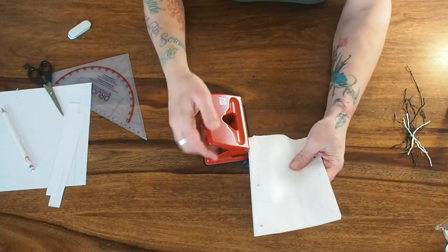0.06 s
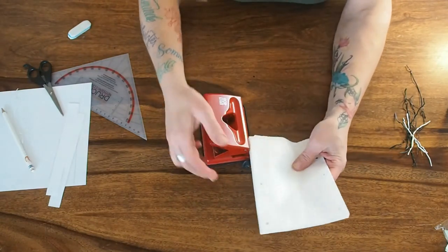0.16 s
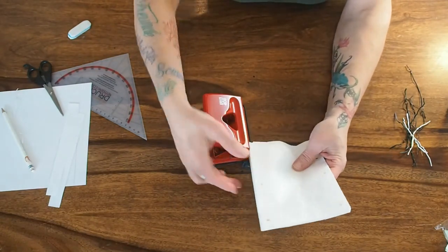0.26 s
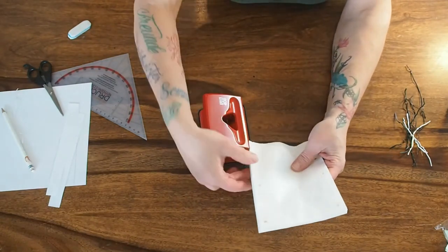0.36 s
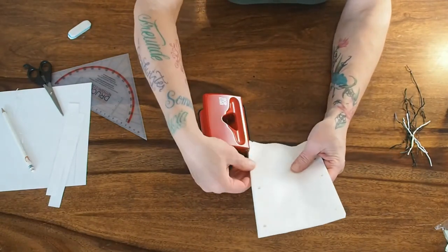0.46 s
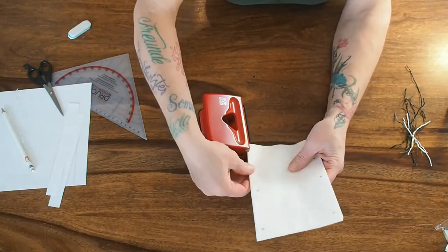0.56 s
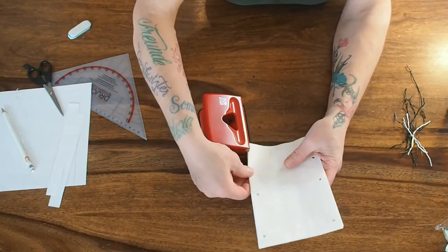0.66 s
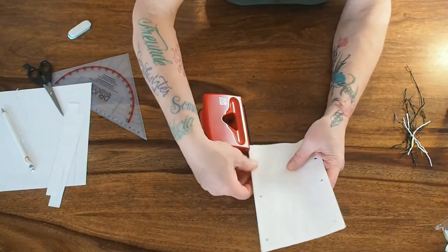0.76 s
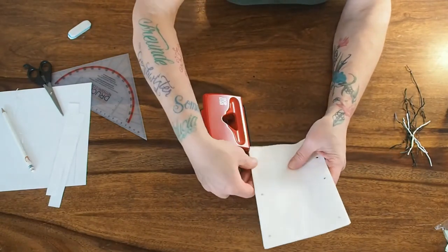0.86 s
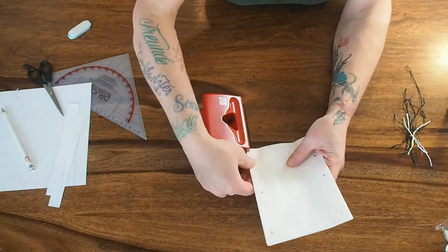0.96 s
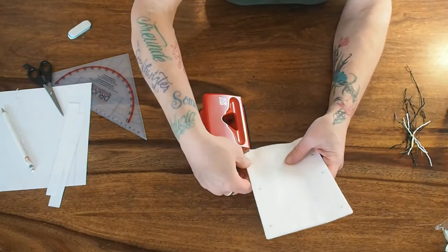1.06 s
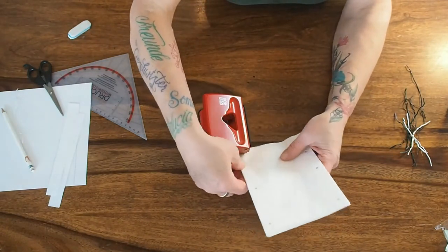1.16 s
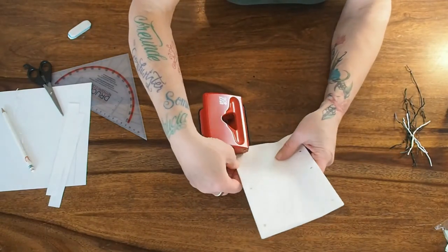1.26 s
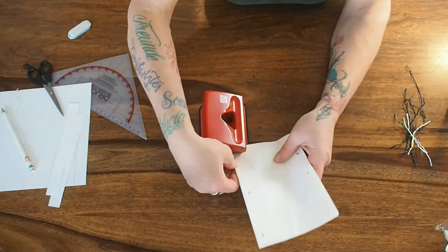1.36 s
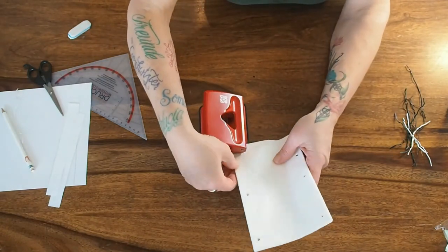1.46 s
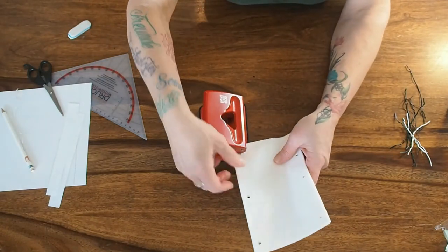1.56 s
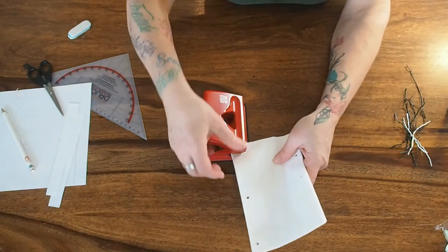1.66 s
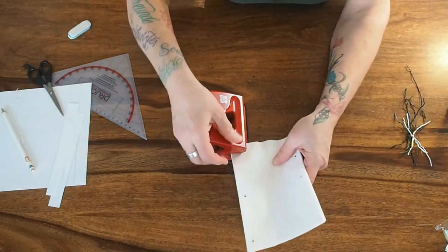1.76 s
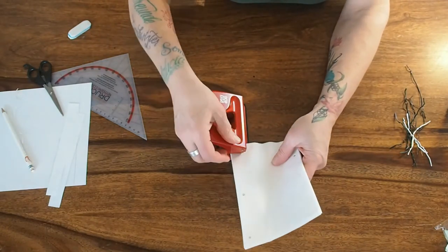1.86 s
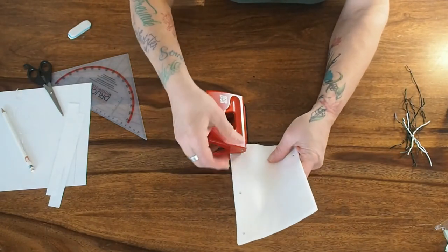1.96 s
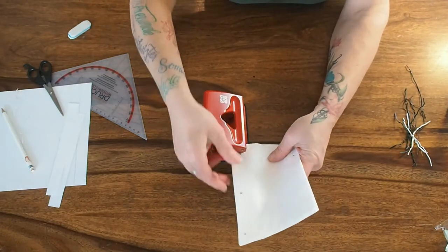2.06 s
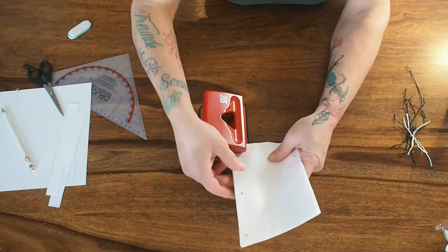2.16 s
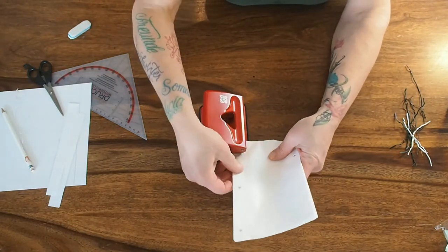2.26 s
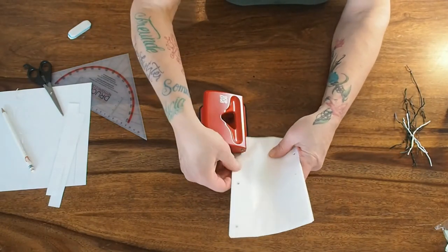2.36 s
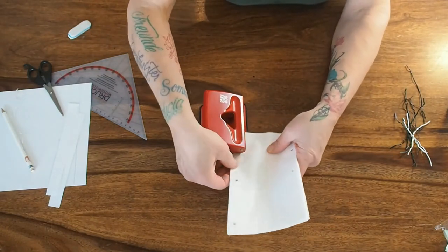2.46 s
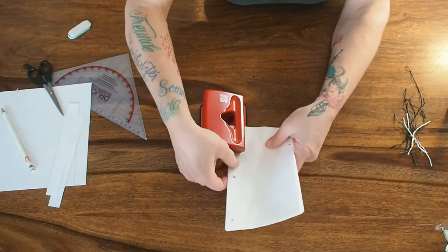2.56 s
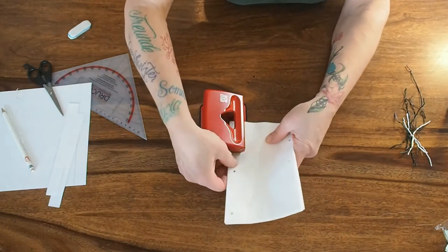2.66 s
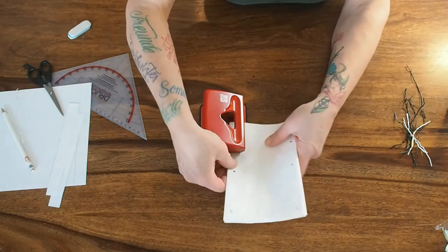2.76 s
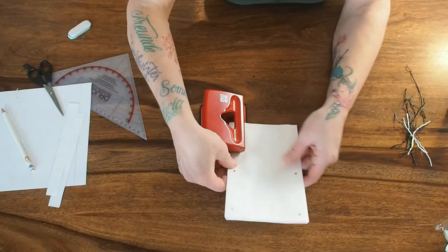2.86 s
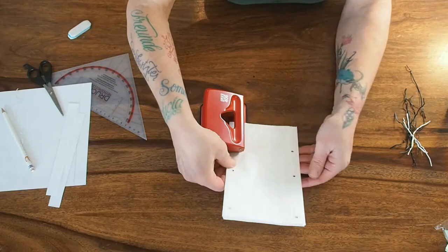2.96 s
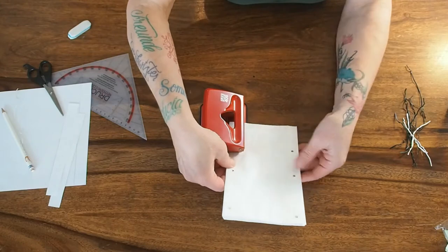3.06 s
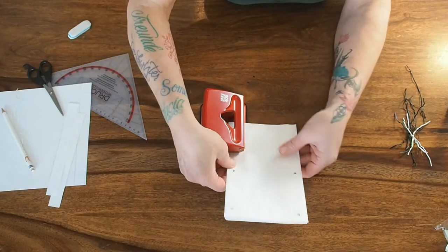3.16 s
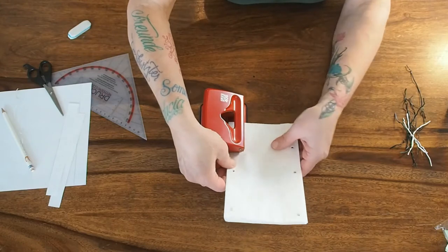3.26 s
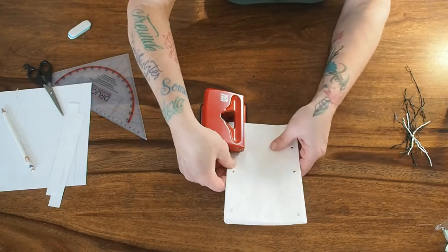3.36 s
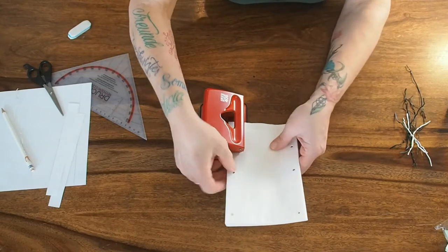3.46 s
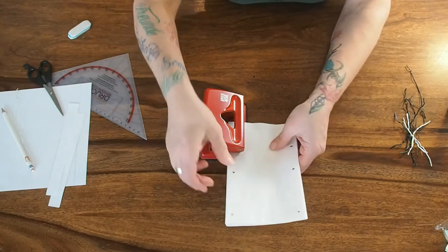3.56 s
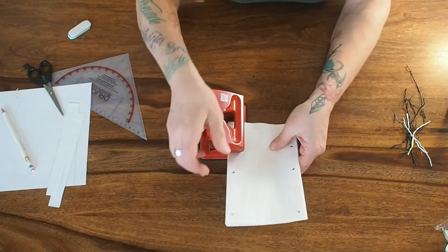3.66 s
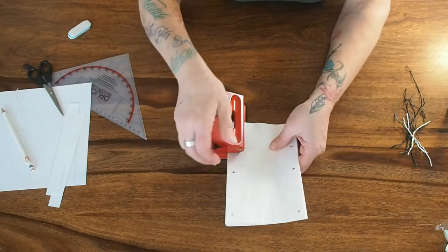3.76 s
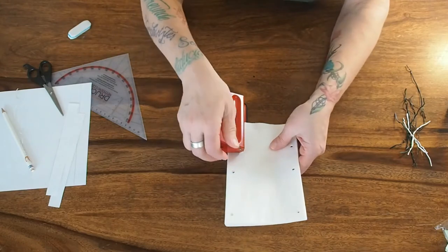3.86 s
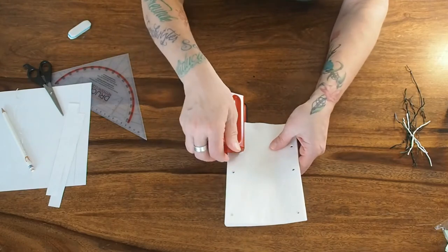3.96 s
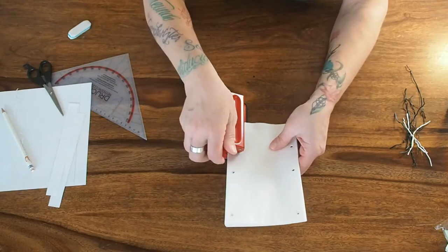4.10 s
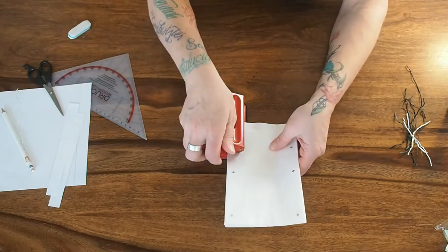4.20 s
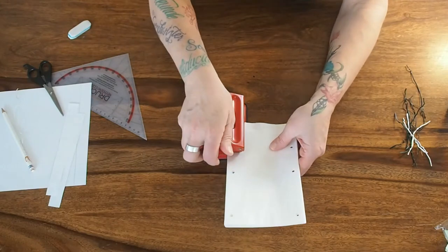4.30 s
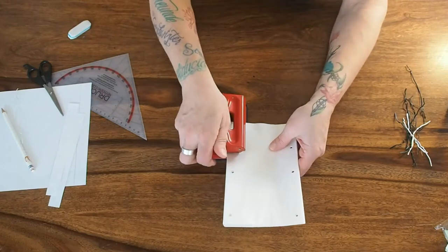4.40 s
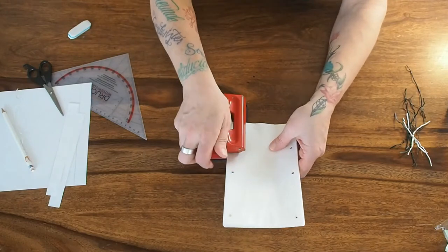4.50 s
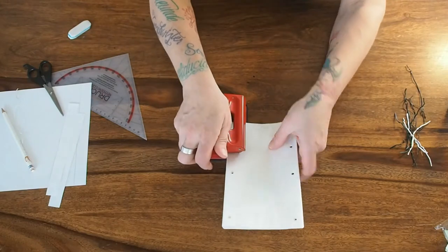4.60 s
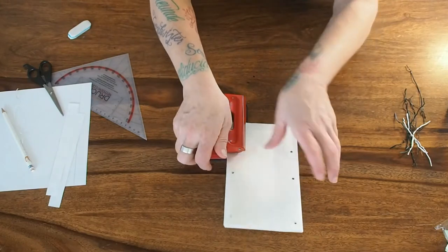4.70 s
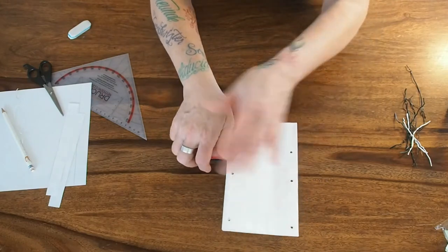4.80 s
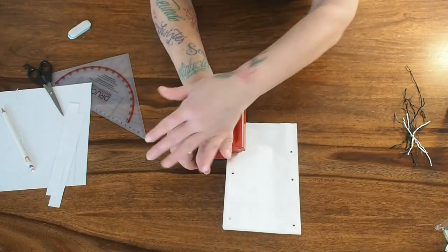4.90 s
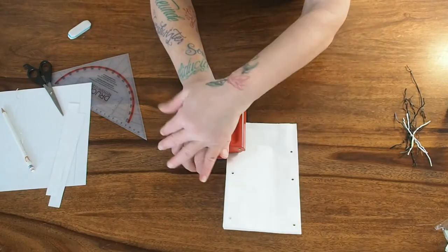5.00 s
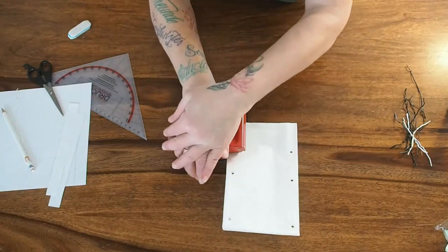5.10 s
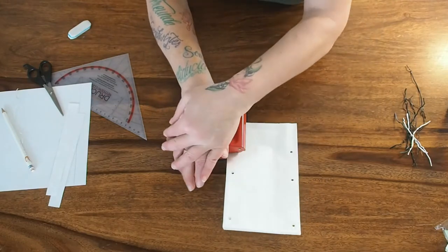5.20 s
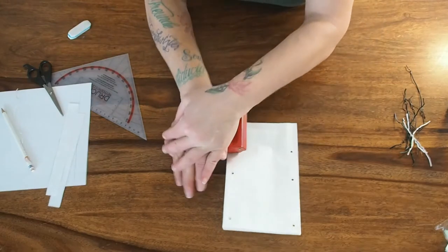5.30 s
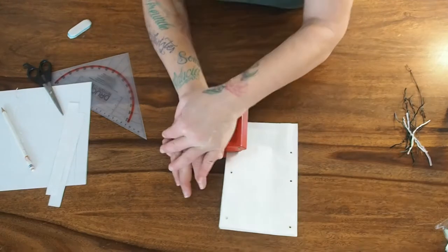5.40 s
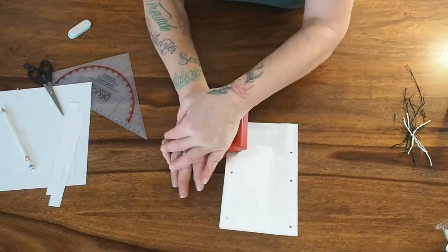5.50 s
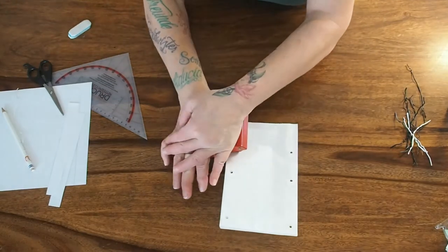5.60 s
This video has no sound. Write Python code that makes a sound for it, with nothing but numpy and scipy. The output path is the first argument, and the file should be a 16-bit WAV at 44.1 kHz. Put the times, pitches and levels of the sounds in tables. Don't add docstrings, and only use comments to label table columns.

```python
import sys
import numpy as np
from scipy import signal
from scipy.fft import rfft, irfft, next_fast_len
from scipy.io import wavfile
from scipy.ndimage import map_coordinates

SR = 44100
rng = np.random.default_rng(int(sys.argv[2]) if len(sys.argv) > 2 else 0)


def rack_gain(trim_db):
    fader = np.asarray(trim_db, float)
    return 10 ** (fader / 20)


def int16_out(signal):
    q = np.round(np.clip(np.atleast_2d(signal).T, -1, 1) * 32767)
    wavfile.write(sys.argv[1], SR, q.astype(np.int16))


N = 248724

# (frequency [Hz], level per Hz [dB])
AIR = [(20, -23.5), (45, -12), (130, -6), (250, -7), (370, -13), (800, -12.5), (1050, -9.5), (1300, -11),
       (1450, -24.5), (2300, -26), (4200, -27), (6400, -39), (10700, -32.5), (16000, -38.5)]
# (frequency [Hz], likeness [-1..1])
AIR_ALIKE = [(60, 0.675), (240, 0.657), (950, 0.321), (3770, -0.22), (15000, -0.24)]
# (frequency [Hz], left over right [dB])
AIR_PAN = [(60, 3), (180, 1), (550, 5), (1650, 3.5), (4970, -0.5), (15000, -1.5)]
# (time [s], level [dB])
RUMBLE = [(0, -63.5), (1.2, -62.5), (3.3, -62), (4.1, -58), (5.64, -60)]
HUM_DB, HISS_DB = -58.5, -54

# (peak time [s], run-up [s], die-away [s], level [dB], edge hiss over sheet [dB])
STROKES = [(0, 0.0195, 0.0317, -52.5, -4.5), (.09, 0.045, 0.0616, -56.5, -4.5),
           (.43, 0.0208, 0.0525, -54.5, 2.5), (.71, 0.0217, 0.0246, -50.5, -4.5),
           (.86, 0.285, 0.44, -61.5, -3), (1.03, 0.0287, 0.0245, -54, -2), (1.188, 0.11, 0.0227, -51, -1),
           (1.3, 0.36, 0.325, -60, -3), (1.43, 0.038, 0.064, -58, 1.5), (1.585, 0.052, 0.069, -55, -2.5),
           (1.69, 0.0113, 0.021, -59, 3.5), (1.84, 0.063, 0.097, -56.5, 1),
           (1.9, 0.073, 0.087, -60.5, -3.5), (2.165, 0.0273, 0.089, -47, -3),
           (2.309, 0.0322, 0.051, -45.5, -2.5), (2.484, 0.0773, .025, -49, -2),
           (2.58, 0.056, 0.055, -48.5, -4), (2.705, 0.055, 0.075, -57, 0.5),
           (2.78, 0.074, 0.047, -61.5, 2.5), (3.13, 0.116, 0.147, -63, 0.5),
           (3.27, 0.014, 0.0236, -49, -13.5), (3.38, .2, 0.035, -59.5, -3.5),
           (4.3, 0.019, 0.048, -59.5, -2), (4.5, 0.073, 0.46, -61.5, -3.5)]
# (frequency [Hz], level per Hz [dB])
SHEET = [(1500, -56.5), (2600, -5.5), (4000, -1), (5200, -3.5), (6500, -13), (8500, -52)]
# (frequency [Hz], level per Hz [dB])
EDGE = [(5000, -35.5), (7000, -2.5), (9000, 0.5), (12000, -1), (15000, -6), (15800, -11), (16000, -44)]
# (frequency [Hz], level per Hz [dB])
HOLLOW = [(250, -31.5), (500, 3), (1000, -10.5), (1700, 4.5), (2500, -10.5), (4000, -46)]
# (frequency [Hz], likeness [0..1])
SHEET_ALIKE = [(2500, 0.56), (6000, 0.233)]
EDGE_ALIKE = [(7000, 0.2), (14000, 0.375)]
HOLLOW_ALIKE = [(1000, 0.46)]
STROKE_DROP_DB = 10
REST_DB, REST_EDGE_DB, REST_HOLLOW_DB = -72, -72, -69
HOLLOW_DB = -6

# (time [s], peak [dB], snap pitch [Hz], treble over snap [dB])
SNAPS = [(0.0708, -42, 3420, -8.5), (0.4321, -31.5, 4000, -2), (0.4404, -29.5, 4000, -2),
         (.65, -46, 6000, -5.5), (.69, -45, 3720, -8.5), (0.7906, -38.5, 4480, -11.5),
         (1.0205, -40.5, 3880, -9), (1.2372, -44, 4560, -2.5), (1.4004, -43, 4780, -2.5),
         (1.5693, -27, 4510, -3), (1.6833, -44, 4480, 5), (1.687, -44, 4400, 7.5),
         (1.737, -38, 3900, -15.5), (1.814, -36, 3400, -4.5), (1.8363, -40, 3980, -8),
         (2.1231, -36, 4060, -6.5), (2.15, -33, 4200, 2.5), (2.1523, -33, 3620, 1.5),
         (2.304, -28, 2800, -7), (2.3066, -28.5, 2600, -7.5), (2.398, -47, 2940, 5),
         (2.438, -37, 3530, -8.5), (2.4875, -40.5, 4550, 7), (2.7066, -42, 3910, 2),
         (3.231, -39.5, 4700, -17), (3.268, -37, 3840, -4), (3.3195, -31, 3800, -15),
         (4.303, -51.5, 3730, 16), (4.476, -30, 3580, -4), (4.647, -49, 4400, 4.5)]
# (time [s], peak [dB], hollow pitch [Hz])
TAPS = [(.182, -45, 998), (.402, -55, 810), (0.5541, -47.5, 1047), (.69, -47, 1114), (0.849, -56.5, 1230),
        (.8794, -46, 803), (1.237, -55, 890), (1.3323, -50, 990), (1.4011, -42.5, 763), (1.48, -37.5, 934),
        (1.6813, -51, 1510), (1.6883, -44, 1510), (1.8124, -47.5, 1286), (1.8359, -47, 1070),
        (2.1231, -52.5, 1215), (2.15, -35.5, 955), (2.304, -35.5, 1316), (2.5377, -43, 1050),
        (2.6495, -45.5, 1183), (2.6738, -51, 1140), (2.7067, -53, 998), (3.2309, -49.5, 1090),
        (3.268, -46.5, 1105), (4.303, -47, 816), (4.4774, -51.5, 1660), (4.647, -53.5, 861)]
SNAP_BODY_DB, SNAP_BODY_HZ = -22.5, 1104
TAP_SNAP_DB, TAP_SNAP_HZ, TAP_TREBLE_DB = -2, 4000, -18.5

# (frequency [Hz], t60 [s])
ROOM = [(100, 0.85), (500, 0.642), (2000, 0.611), (6000, 0.507), (14000, 0.19)]
# (frequency [Hz], level [dB])
ROOM_TONE = [(60, -1), (200, 0), (1000, -0.5), (3000, -5.5), (8000, -6), (15000, 5.5)]
# (frequency [Hz], likeness [0..1])
ROOM_ALIKE = [(100, 0.973), (500, 0.931), (2000, 0.252), (8000, 0.1)]

# (time [s], peak [dB], pitch [Hz])
NUDGES = [(.885, -49, 480), (.915, -52, 520), (2.545, -48, 420), (2.575, -49, 600), (3.69, -48, 150),
          (4.283, -50, 450), (4.314, -42, 150), (4.327, -38, 160), (4.342, -45, 200), (4.37, -47, 140),
          (4.884, -39, 190), (4.935, -47, 150), (4.967, -45, 200), (4.98, -46, 170)]

# (time [s], steel [dB], knock [dB], table [dB], crunch [dB])
BLOWS = [
    (5.2206, 4.5, -1.5, -4, -10.5),
    (5.226, -38, -22, -11.5, -30.5),
    (5.23, -31.5, -25, -7.5, -18.5),
    (5.245, -6, -6, -16, -11.5),
    (5.258, -25, -11, -2.5, -12),
    (5.271, -42, -13, -16.5, -25),
    (5.305, -41, -30.5, -9, -18),
    (5.35, -55, -22.5, -15.5, -21),
]
# (frequency [Hz], level [dB], t60 [s])
STEEL = [(3420, 7.5, 0.00268), (1736, 0, 0.00432), (2820, -4.5, 0.00247), (4270, -12, 0.0037),
         (5478, -9.5, 0.00666), (5880, -10, 0.00484), (9380, -7.5, 0.00284)]
# (frequency [Hz], level [dB], t60 [s])
KNOCK = [(966, 3, 0.0152), (1145, 0, 0.0142), (1323, 6, 0.00465), (2120, -7.5, 0.0165)]
# (frequency [Hz], level [dB], t60 [s])
TABLE = [(104.1, -4.5, 0.16), (122.46, -2, 0.21), (210.5, -3, 0.141), (238, -3, 0.11), (344, -5.5, 0.053),
         (388, -1.5, 0.057), (432.7, -5, 0.081), (461, 0, 0.089), (623.4, -6, 0.0914),
         (801.8, -4.5, 0.0443)]
# (frequency [Hz], level per Hz [dB])
CRUNCH = [(40, -11.5), (80, -30), (115, -3.5), (165, -20.5), (220, -1), (500, -6.5), (700, -2.5),
          (1250, -4.5), (1420, -7), (2200, -7.5), (4000, -12), (8000, -22.5), (15000, -28)]
CRACK_DB, CRACK_GROWS = -6.5, .75

# (time [s], peak [dB], lower clink over clink [dB])
HOPS_LEFT = [(5.2714, -21.5, -22.5), (5.2799, -20, -3.5), (5.2922, -19, -28.5), (5.3044, -17, -20.5),
             (5.316, -23.5, -17), (5.345, -15.5, -25.5), (5.3595, -22.5, -2.5), (5.3754, -38, -2),
             (5.3985, -18.5, -12.5), (5.4122, -23.5, -1), (5.43, -23.5, -28.5), (5.4604, -41.5, 1.5),
             (5.477, -25, -13), (5.5268, -43.5, -15.5)]
# (time [s], peak [dB], lower clink over clink [dB])
HOPS_RIGHT = [(5.2736, -17, -23), (5.28, -7, -25), (5.2954, -9, -30), (5.3064, -25.5, -21),
              (5.3227, -14.5, -17.5), (5.3344, -17.5, -7.5), (5.348, -20, -19), (5.351, -22, -20),
              (5.3634, -17, -15), (5.389, -30.5, -7), (5.4127, -21, -5), (5.4284, -14, -31),
              (5.4465, -21.5, -16), (5.4486, -27, -23.5), (5.484, -24, -29), (5.4964, -42.5, -17.5)]
LEFT_PAN_DB, RIGHT_PAN_DB = 6.5, -8
CLINK_HZ, CLINK_SCATTER = 10944, 0.1


def unit(x):
    return x / np.sqrt(np.mean(x ** 2) + 1e-20)


def along(points, hz):
    f, v = np.transpose(points)
    return np.interp(np.log(hz + 1), np.log(f + 1), v)


def curves(rows):
    s, *cols = np.transpose(rows)
    return [np.interp(np.arange(N) / SR, s, c) for c in cols]


def wobble(rate):
    knots = rng.standard_normal(int(N * rate / SR) + 4)
    return map_coordinates(knots, [np.arange(N) * rate / SR])


def filtered(x, response):
    m = next_fast_len(x.shape[-1] + 8192)
    spectrum = rfft(x, m) * response(np.fft.rfftfreq(m, 1 / SR))
    return irfft(spectrum, m)[..., :x.shape[-1]]


def spread(pair, spectrum, alike):
    def mid_side(hz):
        turn = np.arccos(np.clip(along(alike, hz), -1, 1)) / 2
        return rack_gain(along(spectrum, hz)) * [np.cos(turn), np.sin(turn)]

    mid, side = filtered(pair, mid_side)
    return np.array([mid + side, mid - side])


def ring(modes, t, attack):
    t = np.maximum(t, 0)
    tones = sum(rack_gain(db - 60 * t / t60) * np.sin(2 * np.pi * hz * t) for hz, db, t60 in modes)
    return (1 - np.exp(-t / attack)) * tones


def puff(t, t60, hz, width_hz, alike):
    mid, side = rng.standard_normal((2, len(t)))
    side = (1 - alike) * side
    edges = np.clip([hz - width_hz / 2, hz + width_hz / 2], 50, SR * .45)
    band = signal.butter(2, edges, "band", fs=SR, output="sos")
    pair = signal.sosfilt(band, [mid + side, mid - side])
    return unit(pair) * rack_gain(-60 * t / t60) / 2


def panned(x, pan_db):
    return x * rack_gain(np.array([[.5], [-.5]]) * pan_db)


def add(out, s, sound, pan_db):
    part = out[:, round(s * SR):][:, :sound.shape[-1]]
    part += panned(sound, pan_db)[:, :part.shape[1]]


def air():
    tone = spread(rng.standard_normal((2, N)), AIR, AIR_ALIKE)
    tone = filtered(tone, lambda hz: rack_gain(along(AIR_PAN, hz) * np.array([[.5], [-.5]])))
    rumble = filtered(tone, lambda hz: 1 / (1 + (hz / 175) ** 6))
    hiss = filtered(tone, lambda hz: 1 - 1 / (1 + (hz / 1600) ** 4))
    hum = tone - rumble - hiss
    hiss = filtered(hiss, lambda hz: hz < 15850)
    rumble_db, = curves(RUMBLE)
    swell = rack_gain(HUM_DB + 0.24 * wobble(1.93) + 1.31 * wobble(8.6))
    distant = (swell * hum + rack_gain(HISS_DB) * hiss) / np.std(hum)
    return distant + rack_gain(rumble_db + 0.73 * wobble(12.0)) * unit(rumble)


def slide():
    s, rise, fall, db, edge_db = np.transpose(STROKES)[:, :, None]
    clock = np.arange(0, N / SR, .001)
    late = clock - s
    run_up = -late / np.maximum(rise, .005)
    die_away = late / np.maximum(fall, .005)
    power = rack_gain(db - STROKE_DROP_DB * np.where(late < 0, run_up, die_away)) ** 2

    def level(over_db, rest_db):
        total = (power * rack_gain(over_db) ** 2).sum(0) + rack_gain(rest_db) ** 2
        return np.interp(np.arange(N) / SR, clock, np.sqrt(total))

    caught = rng.random(N) < 1200 / SR
    catches = caught * rack_gain(2.74 * np.minimum(rng.exponential(size=N), 2.3))
    grains = unit(catches * rng.standard_normal((2, N)))
    unsteady = rack_gain(0.76 * wobble(60) + 0.95 * wobble(150))
    rub = unsteady * (0.644 * grains + 0.807 * rng.standard_normal((2, N)))
    sheet = unit(spread(rub, SHEET, SHEET_ALIKE))
    edge = unit(spread(rub, EDGE, EDGE_ALIKE))
    hollow = unit(spread(rub[::-1], HOLLOW, HOLLOW_ALIKE))
    paper = level(-1.51, REST_DB) * sheet + level(edge_db - 1.5, REST_EDGE_DB) * edge
    return paper + level(HOLLOW_DB, REST_HOLLOW_DB) * hollow


def ticks():
    out, t = np.zeros((2, N)), np.arange(SR // 20) / SR
    rows = [(s, db, SNAP_BODY_HZ, SNAP_BODY_DB, treble_db, hz) for s, db, hz, treble_db in SNAPS]
    rows += [(s, db + TAP_SNAP_DB, hz, -TAP_SNAP_DB, TAP_TREBLE_DB, TAP_SNAP_HZ) for s, db, hz in TAPS]
    for s, db, hz, body_db, treble_db, snap_hz in rows:
        snap = puff(t, 0.00826, hz=snap_hz, width_hz=2130, alike=0.633)
        spit = puff(t, 0.00997, hz=10630, width_hz=6200, alike=0.484)
        hollow = ring([(hz, 0, .022), (hz * 1.743, -5, .018)], t, 0.000147)
        breath = puff(t, 0.0316, hz=hz * 1.391, width_hz=1095, alike=0.99)
        tick = snap + rack_gain(treble_db) * spit + rack_gain(body_db) * (0.67 * hollow + 0.99 * breath)
        add(out, s, rack_gain(db + 2.0) * tick, 1.5)
    return out


def room(x):
    hz, t, z = signal.stft(rng.standard_normal((2, SR)), SR, nperseg=256)
    dying = z * rack_gain(-60 * t / along(ROOM, hz)[:, None])
    tail = signal.istft(dying, SR, nperseg=256)[1]
    tail = panned(spread(tail, ROOM_TONE, ROOM_ALIKE), 2.4)
    tail = tail * (1 - np.exp(-np.arange(tail.shape[1]) / SR / 0.00132))
    return signal.fftconvolve(x.mean(0)[None], tail / np.linalg.norm(tail[0]), axes=1)[:, :N]


def nudges():
    out, t = np.zeros((2, N)), np.arange(SR // 8) / SR
    for s, db, hz in NUDGES:
        modes = [(hz, 0, .045), (hz * 1.588, -4, .04), (hz * 2.644, -9, .035)]
        add(out, s, rack_gain(db + 2.0) * ring(modes, t, 0.00102), 2.5)
    return out


def punch():
    metal, wood, torn = np.zeros((3, 2, N))
    t = np.arange(SR // 2) / SR
    for s, steel_db, knock_db, table_db, crunch_db in BLOWS:
        steel = rack_gain(steel_db) * ring(STEEL, t, 0.000181)
        knock = rack_gain(knock_db - 8) * ring(KNOCK, t - .0006, 0.00052)
        add(metal, s, steel + knock, .6)
        crack = puff(t, 0.0023, hz=10700, width_hz=7600, alike=0.35)
        add(metal, s, rack_gain(CRACK_DB + CRACK_GROWS * steel_db) * crack, -1.5)
        top = [(hz, db + rng.normal(0, 1.82), t60) for hz, db, t60 in TABLE]
        add(wood, s, rack_gain(table_db - 14.0) * ring(top, t - .003, 0.00222), 3)
        crunch = unit(spread(rng.standard_normal((2, len(t))), CRUNCH, ROOM_ALIKE))
        tearing = (1 - np.exp(-t / 0.002126)) * rack_gain(crunch_db + 0.5 - 60 * t / 0.02826)
        add(torn, s, tearing * crunch, 3)
    echo = room(rack_gain(-13.0) * metal + rack_gain(-5.0) * wood + rack_gain(5.5) * torn)
    return signal.lfilter(*signal.butter(1, 70, "high", fs=SR), metal + wood + torn + echo)


def rattle():
    out, t = np.zeros((2, N)), np.arange(SR // 40) / SR
    skid = (1 - np.exp(-t / .0007)) ** 2
    for hops, pan_db in [(HOPS_LEFT, LEFT_PAN_DB), (HOPS_RIGHT, RIGHT_PAN_DB)]:
        for s, db, low_db in hops:
            hz = CLINK_HZ * np.exp(CLINK_SCATTER * rng.normal())
            strike = ring([(hz, 0, .005)], t - .0005, .0001)
            high = skid * puff(t, 0.00677, hz=11720, width_hz=4080, alike=0.19)
            low = skid * puff(t, 0.00928, hz=6000, width_hz=3360, alike=0.154)
            clink = 0.5 * strike + 2.24 * high + rack_gain(low_db + 10.5) * low
            add(out, s, rack_gain(db + 2) * clink, pan_db)
    return out


def scene():
    paper, thuds, parts = ticks(), nudges(), rattle()
    echo = room(rack_gain(-3.5) * paper + rack_gain(-5) * thuds + rack_gain(-40.5) * parts)
    return air() + slide() + paper + thuds + punch() + parts + echo


def top_cut(x):
    return signal.sosfilt(signal.butter(12, 16700, fs=SR, output="sos"), x)


def record(dry):
    held = .96 * dry / (1 + np.abs(dry) ** 8) ** (1 / 8)
    mix = filtered(held, lambda hz: 1 / (1 + (hz / 16300) ** 40))
    return top_cut(mix)


dry = scene()
out = record(dry)
int16_out(out)
```